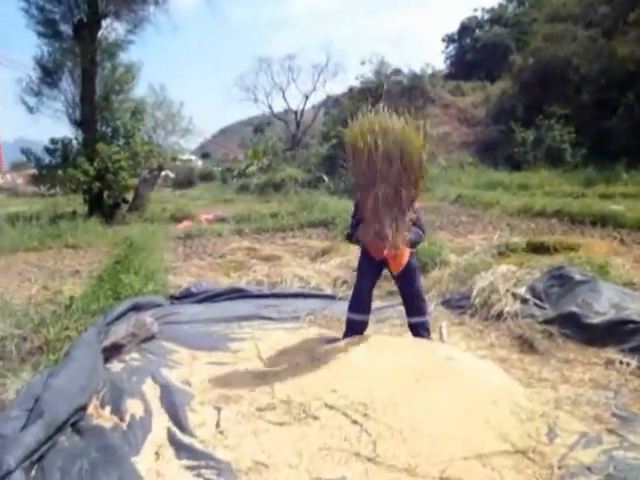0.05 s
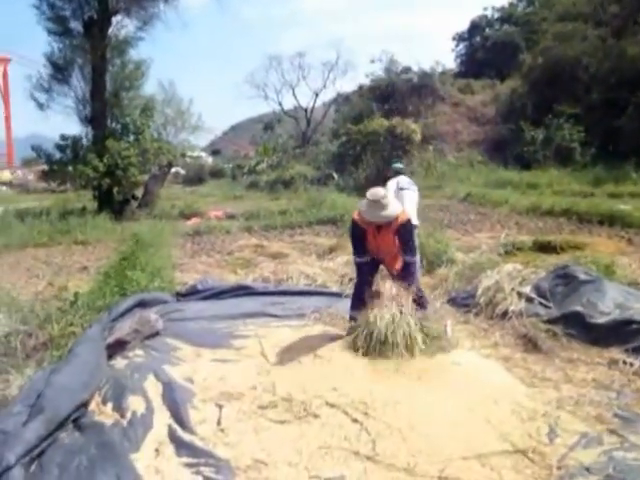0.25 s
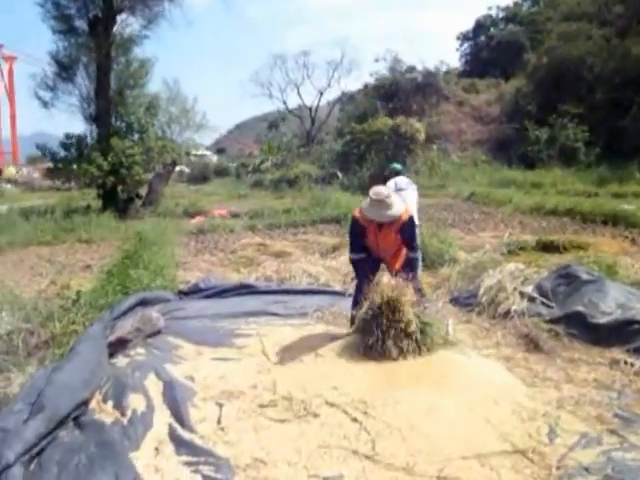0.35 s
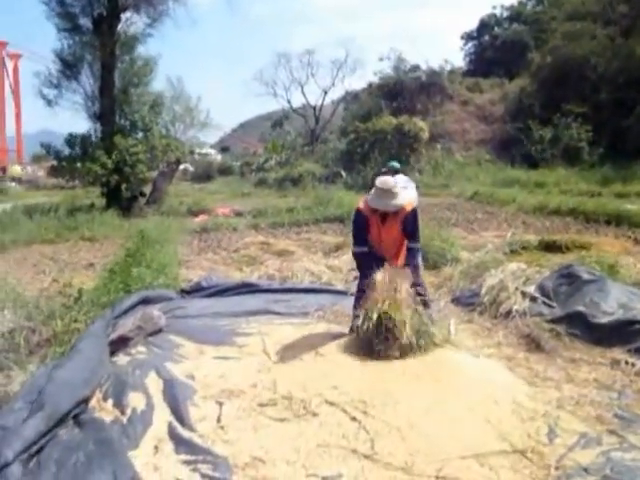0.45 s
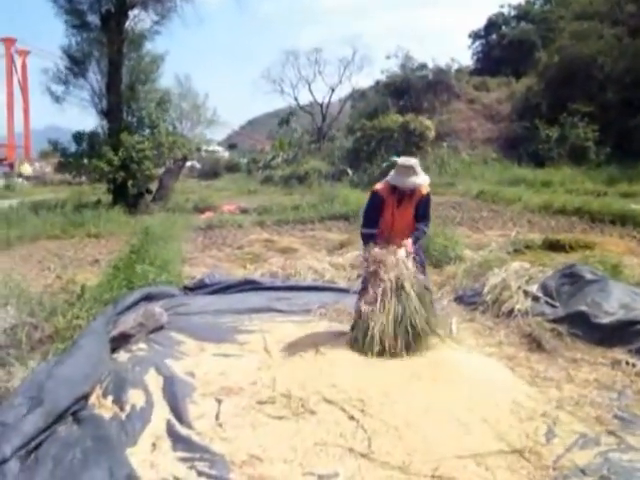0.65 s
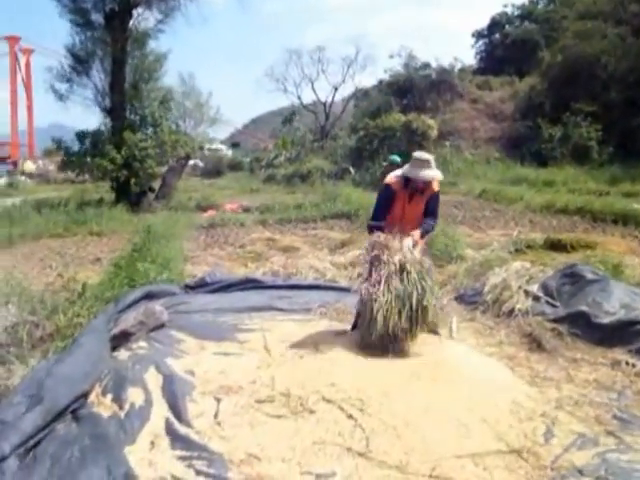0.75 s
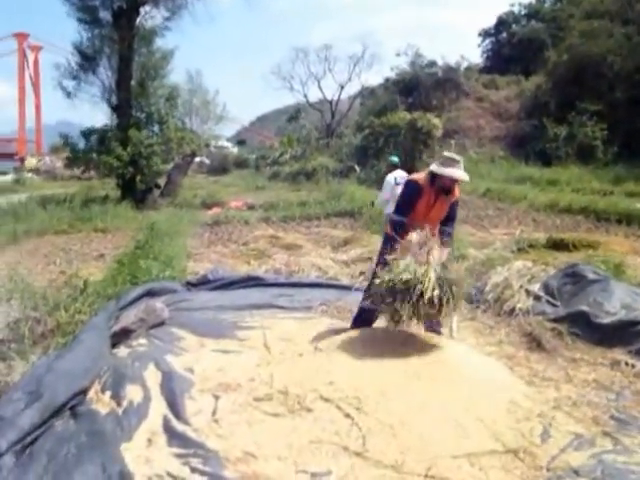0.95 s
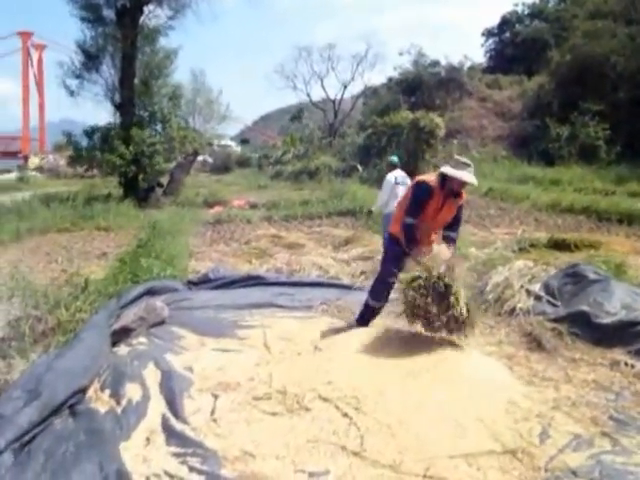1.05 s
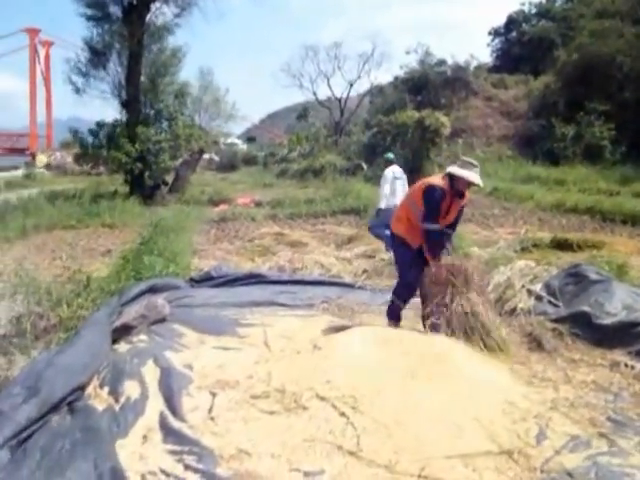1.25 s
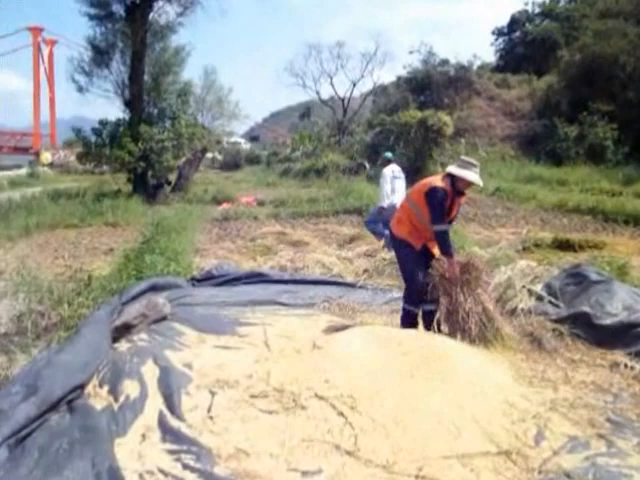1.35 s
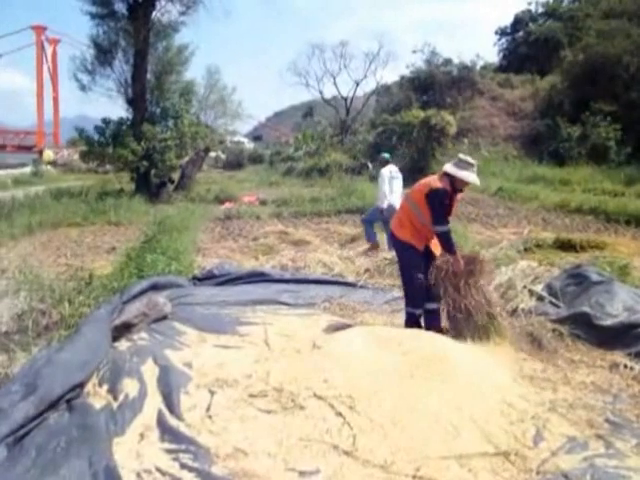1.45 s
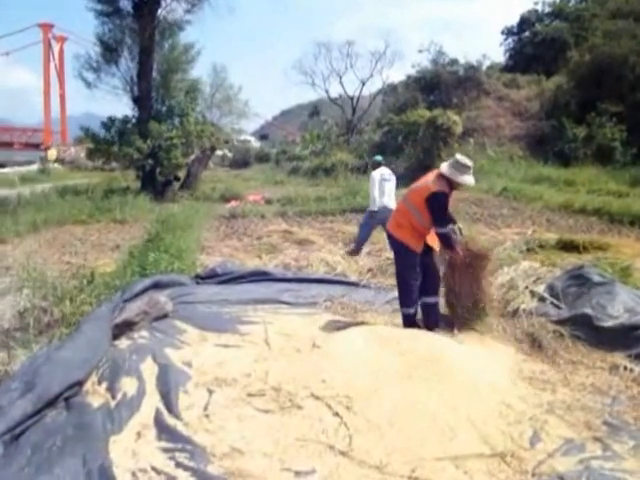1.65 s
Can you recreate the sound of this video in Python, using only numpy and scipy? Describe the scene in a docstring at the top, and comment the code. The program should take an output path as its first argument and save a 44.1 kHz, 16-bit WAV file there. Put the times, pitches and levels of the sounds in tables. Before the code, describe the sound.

A sheaf of rice crashes onto a grain heap and rustles, with wind buffeting the microphone.

```python
"""Wind hisses over an open field and buffets the microphone while a sheaf of rice swishes down.
It crashes onto a heap of grain: stalks crackle and snap, and the heap takes the load with a dull thud.
The dry stalks go on rustling as the sheaf is shaken and turned over, under a faint hollow note of wind.
The small microphone rings near 6 kHz, and its gain control ducks after the blow."""
import sys
import numpy as np
from scipy import signal
from scipy.fft import rfft, irfft
from scipy.io import wavfile

SR = 44100
rng = np.random.default_rng(int(sys.argv[2]) if len(sys.argv) > 2 else 0)


def master_out(mix):
    """Clip the mix to full scale and print it as 16-bit PCM to the path in sys.argv[1]."""
    frames = np.transpose(np.atleast_2d(mix))
    ceiling = np.clip(frames, -1, 1)
    pcm = np.round(ceiling * 32767).astype(np.int16)
    wavfile.write(sys.argv[1], SR, pcm)


N = 74970
TIME_S = np.arange(N) / SR


def from_db(db):
    return 10 ** (np.asarray(db) / 20)


def unit_rms(x):
    return x / np.sqrt(np.mean(x ** 2) + 1e-20)


def level(rows):
    """Gain over time from (time_s, level_db) points."""
    return from_db(np.interp(TIME_S, *np.transpose(rows)))


def coloured(noise, spectrum):
    """Gives a steady noise a spectrum, at an rms of 1."""
    hz, db = np.transpose(spectrum)
    bins_hz = np.maximum(np.fft.rfftfreq(N, 1 / SR), 1)
    gain = from_db(np.interp(np.log(bins_hz), np.log(hz), db))
    return unit_rms(irfft(rfft(noise) * gain, N))


def clicks(per_s, spread_db):
    """Tiny random contacts of uneven size and either sign."""
    hits = rng.random(N) < per_s / SR
    size = from_db(spread_db * np.minimum(rng.exponential(1, N), 4))
    return hits * size * rng.choice([-1, 1], N)


def burst(start_s, attack_s, hold_s, fall_db_per_s):
    """Envelope with a quick rise, a hold and a steady fall."""
    age = TIME_S - start_s
    rise = np.clip(age / attack_s, 0, 1)
    return rise * from_db(-fall_db_per_s * np.maximum(age - attack_s - hold_s, 0))


def smooth(x, lag_s):
    """One-pole low-pass."""
    pole = np.exp(-1 / (lag_s * SR))
    return signal.lfilter([1 - pole], [1, -pole], x)


def puffs(rows):
    """Smooth pressure bumps with a dip on either side; polarity 1 pushes, -1 pulls."""
    pressure = np.zeros(N)
    for time_s, peak_db, pitch_hz, polarity in rows:
        spread = (np.pi * pitch_hz * (TIME_S - time_s)) ** 2
        pressure += polarity * from_db(peak_db) * (1 - 2 * spread) * np.exp(-spread)
    return pressure


def bell(x, hz, db, q):
    """Peak or dip filter."""
    gain, angle = np.sqrt(from_db(db)), 2 * np.pi * hz / SR
    width, centre = np.sin(angle) / (2 * q), -2 * np.cos(angle)
    zeros = [1 + width * gain, centre, 1 - width * gain]
    poles = [1 + width / gain, centre, 1 - width / gain]
    return signal.lfilter(zeros, poles, x)


# Wind out over the field: time_s, level_db
WIND_LEVEL = [(0, -31.5), (.3, -31.5), (.55, -34.5), (.8, -33), (1.0, -32), (1.3, -31.5), (1.7, -31)]
# Colour of its hiss: frequency_hz, relative_db
WIND_SPECTRUM = [(25, -5.5), (70, -6), (150, 2.5), (280, 1), (500, 0.5), (1200, 0.5), (2200, -4.5),
                 (4000, -8.5), (6000, -10), (9000, -19), (15500, -25.5)]
def field_wind():
    """Air moving over open ground makes a smooth, broad hiss."""
    return level(WIND_LEVEL) * coloured(rng.standard_normal(N), WIND_SPECTRUM)


# A faint hollow note in the background wind: time_s, level_db, pitch_hz
HOLLOW_NOTE = [(.6, -64, 250), (0.781, -43, 263.3), (.92, -37.5, 284.3), (0.961, -32.5, 369),
               (1.001, -42.5, 333.5), (1.12, -40, 312.9), (1.2, -53, 300.9), (1.289, -36, 339.4),
               (1.4, -63, 330)]
def hollow_wind(width_hz=93):
    """A narrow band of wind noise whose centre wanders."""
    time_s, level_db, pitch_hz = np.transpose(HOLLOW_NOTE)
    phase = 2 * np.pi * np.cumsum(np.interp(TIME_S, time_s, pitch_hz)) / SR
    lag_s = 1 / (2 * np.pi * width_hz)
    drift = smooth(smooth(rng.standard_normal((2, N)), lag_s), lag_s)
    band = drift[0] * np.cos(phase) + drift[1] * np.sin(phase)
    return from_db(np.interp(TIME_S, time_s, level_db)) * unit_rms(band)


# Wind rumble right on the microphone: time_s, level_db
RUMBLE_LEVEL = [(0, -37.5), (.12, -35.5), (.17, -38.5), (.23, -34), (.32, -42), (.42, -36), (.49, -38),
                (.56, -54), (.88, -63), (.98, -29), (1.05, -45), (1.13, -41), (1.22, -55), (1.42, -41),
                (1.55, -54), (1.7, -35)]
# Colour of the rumble: frequency_hz, relative_db
RUMBLE_SPECTRUM = [(20, -35), (50, -10), (110, -13.5), (200, -22.5), (400, -15), (1200, -57)]
# Single eddies hitting the microphone port: time_s, peak_db, pitch_hz, polarity
PORT_EDDIES = [(.051, -18.5, 126, -1), (.1, -28, 127, 1), (.104, -18.5, 152, -1), (.119, -24, 170, -1),
               (.2045, -16, 95, 1), (.219, -24, 64.4, -1), (0.2507, -15.5, 91, 1), (0.2607, -23, 120, -1),
               (1.04, -16, 69.5, 1), (1.687, -21.5, 79.5, 1)]
def wind_buffeting():
    """Gusts rumble on the microphone, and single eddies bump its port."""
    rumble = level(RUMBLE_LEVEL) * coloured(rng.standard_normal(N), RUMBLE_SPECTRUM)
    return rumble + puffs(PORT_EDDIES)


# The sheaf swung, shaken and turned over at the heap: time_s, level_db
RUSTLE_LEVEL = [(0, -38), (.15, -37), (.25, -34.5), (.31, -30), (.40, -25), (.45, -30.5), (.50, -36.5),
                (.54, -40.5), (.61, -39), (.70, -31), (.74, -34), (.82, -35), (1.0, -45), (1.24, -51),
                (1.30, -38.5), (1.35, -33), (1.44, -30), (1.52, -33), (1.6, -32), (1.7, -36.5)]
# Colour of dry straw, rubbing or snapping: frequency_hz, relative_db
STRAW_SPECTRUM = [(300, -17), (1500, -24.5), (2500, -2), (3400, 0), (4500, -7.5), (6000, 2.5), (9000, -3.5),
                  (12000, -6.5), (15500, -11.5)]
def sheaf_rustle():
    """Dry stalks and grains rub in thousands of small contacts."""
    return level(RUSTLE_LEVEL) * coloured(clicks(per_s=8000, spread_db=1.5), STRAW_SPECTRUM)


# Single stalks breaking in the sheaf: start_s, level_db
STALK_SNAPS = [(0.3276, -22), (0.344, -17), (0.387, -12), (0.389, -11), (0.507, -30), (1.349, -29)]
def stalk_snaps():
    """A few stalks crack on their own, each a very short burst of bright noise."""
    envelope = sum(from_db(level_db) * burst(start_s, attack_s=.0002, hold_s=.0004, fall_db_per_s=7000)
                   for start_s, level_db in STALK_SNAPS)
    return envelope * coloured(rng.standard_normal(N), STRAW_SPECTRUM)


# The heap takes the weight, then gives way: time_s, peak_db, pitch_hz, polarity
HEAP_PUSHES = [(.3613, -2, 247, 1), (.3695, -1, 86.5, -1)]
# Damped resonances of the heap of grain: pitch_hz, relative_db, t60_s
HEAP_MODES = [(85, -10.5, 0.041), (226, 4, 0.068), (454, -1.5, 0.034), (705, 0.5, 0.071), (894, -4, 0.08)]
def heap_thud(start_s=.3558, rise_s=.004, contact_hz=900, ring_gain_db=-5.5):
    """The heap takes the soft load over a few milliseconds: a low push and a short dead ring."""
    age = np.maximum(TIME_S - start_s, 0)
    ring = np.zeros(N)
    for pitch_hz, relative_db, t60_s in HEAP_MODES:
        envelope = burst(start_s, rise_s, hold_s=0, fall_db_per_s=60 / t60_s)
        ring += from_db(relative_db) * envelope * np.sin(2 * np.pi * pitch_hz * age)
    dull_ring = smooth(ring, 1 / (2 * np.pi * contact_hz))
    return puffs(HEAP_PUSHES) + from_db(ring_gain_db) * dull_ring


# Bunches of stalks landing on the heap: start_s, level_db, hold_s, fall_db_per_s
BUNCH_LANDINGS = [(0.3255, -28.5, 0.0047, 300), (0.3503, -14, .003, 500), (.353, -8, .005, 600),
                  (0.36, -5.5, 0.0048, 603), (.3742, -3.5, 0.0028, 1150)]
# Colour of their crackle: frequency_hz, relative_db
CRASH_SPECTRUM = [(200, -14), (700, -4.5), (1100, -8), (1450, 0), (1800, -8.5), (2150, -0.5), (2500, -7.5),
                  (3200, 5), (4200, -4), (6000, 2.5), (9000, -6.5), (12000, -11), (15500, -15)]
def sheaf_crash(attack_s=.0015):
    """The sheaf lands bunch after bunch, in dense crackles that add in power."""
    power = sum((from_db(level_db) * burst(start_s, attack_s, hold_s, fall_db_per_s)) ** 2
                for start_s, level_db, hold_s, fall_db_per_s in BUNCH_LANDINGS)
    return np.sqrt(power) * coloured(clicks(per_s=13000, spread_db=2.0), CRASH_SPECTRUM)


def scene():
    """One blow of the sheaf in a windy field, as it reaches a mono microphone."""
    threshing = sheaf_rustle() + sheaf_crash() + stalk_snaps() + heap_thud()
    wind = field_wind() + wind_buffeting() + hollow_wind()
    return (threshing + wind)[None]


# Resonances and a dip of the small microphone: centre_hz, gain_db, q
MIC_RESONANCES = [(5665, 11, 2), (8510, 4, 8.3), (12800, -3.5, 15)]
# Its narrow nulls: centre_hz, width_hz
MIC_NULLS = [(4830, 590), (7740, 1450), (9650, 51)]
def record(dry, duck_above_db=-9.5, recover_db_per_s=78, ceiling=.88, cutoff_hz=15750):
    """The small microphone colours the sound; its gain control ducks at the blow and recovers."""
    x = dry
    for centre_hz, gain_db, q in MIC_RESONANCES:
        x = bell(x, centre_hz, gain_db, q)
    for centre_hz, width_hz in MIC_NULLS:
        x = signal.lfilter(*signal.iirnotch(centre_hz, centre_hz / width_hz, fs=SR), x)
    sensed_db = 10 * np.log10(smooth(x ** 2, lag_s=.0067) + 1e-12)
    excess_db = np.maximum(sensed_db - duck_above_db, 0)
    # The gain drops by each peak's excess, then climbs back at a steady rate.
    recovery_db = recover_db_per_s * TIME_S
    duck_db = np.maximum.accumulate(excess_db + recovery_db, axis=-1) - recovery_db
    x = x * from_db(-smooth(duck_db, lag_s=.0013))
    x = x / (1 + (x / ceiling) ** 6) ** (1 / 6)  # rounded overload
    top_cut = signal.ellip(12, .1, 60, cutoff_hz, fs=SR, output="sos")
    return signal.sosfiltfilt(top_cut, x)


dry = scene()
out = record(dry)
master_out(out)
```